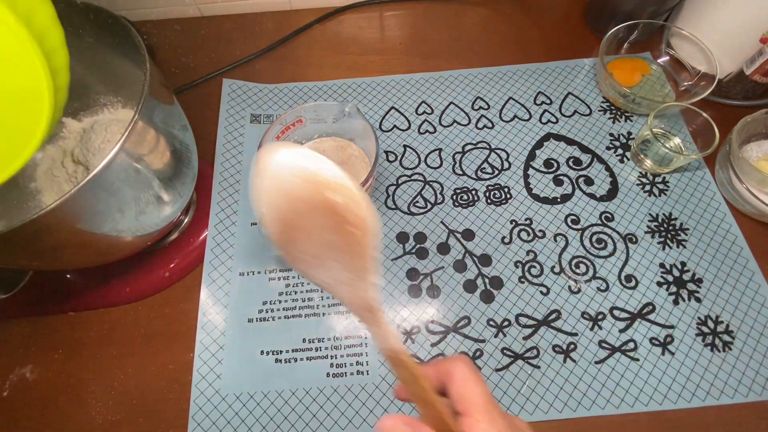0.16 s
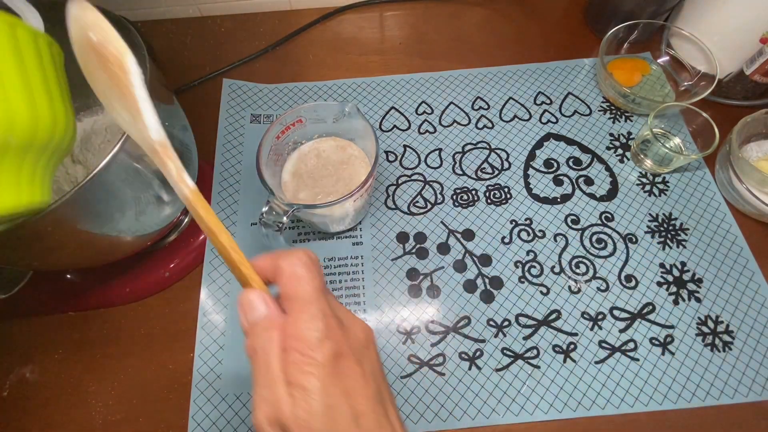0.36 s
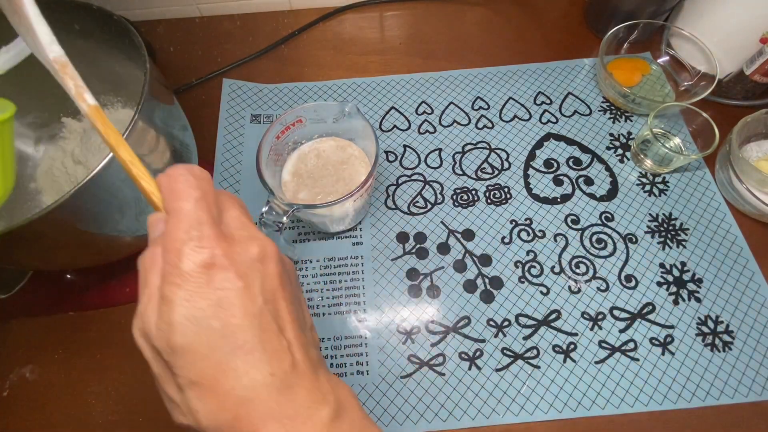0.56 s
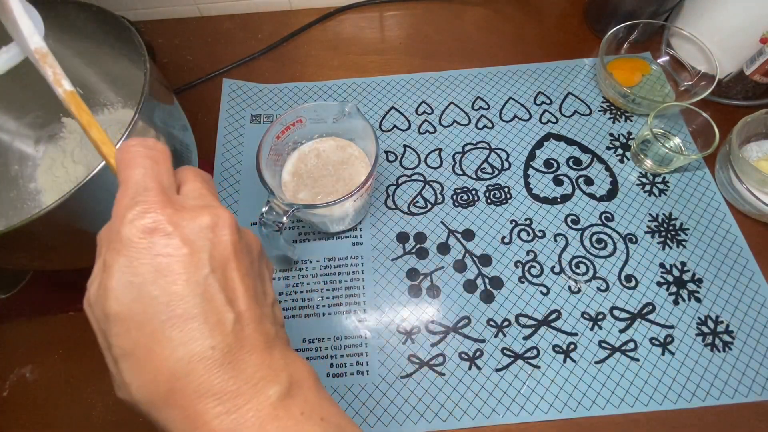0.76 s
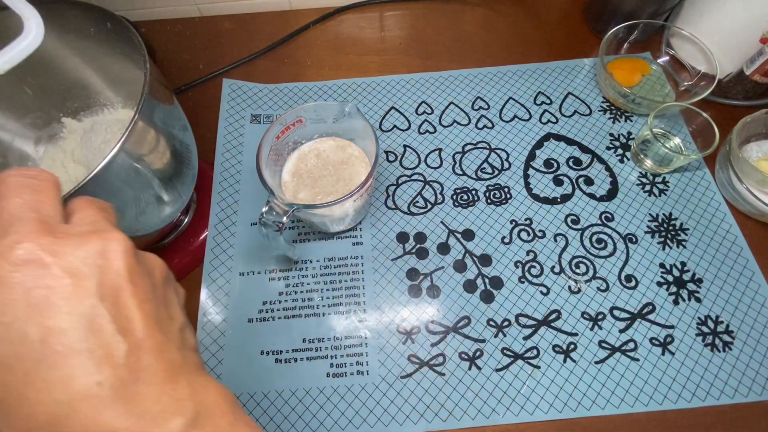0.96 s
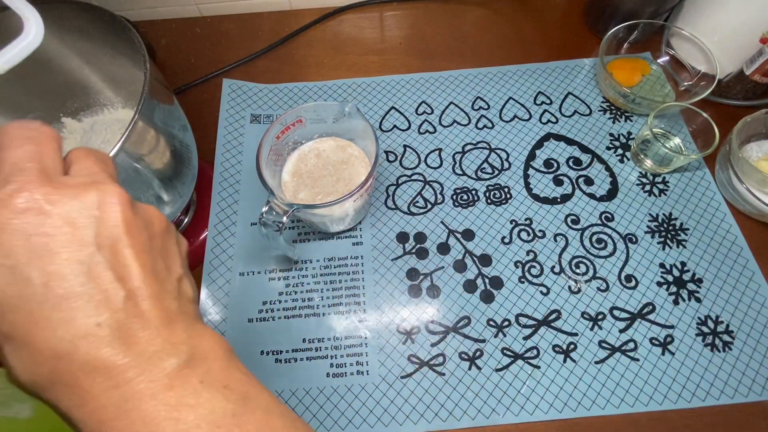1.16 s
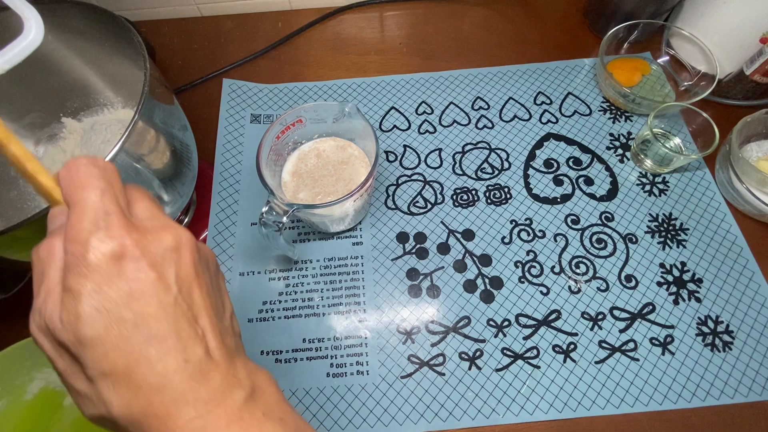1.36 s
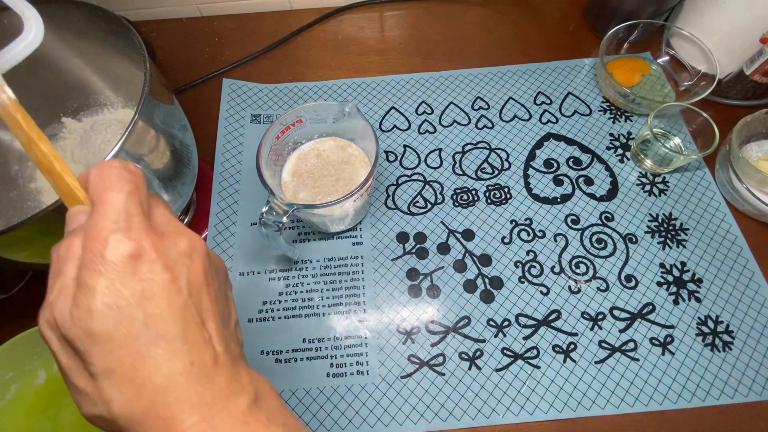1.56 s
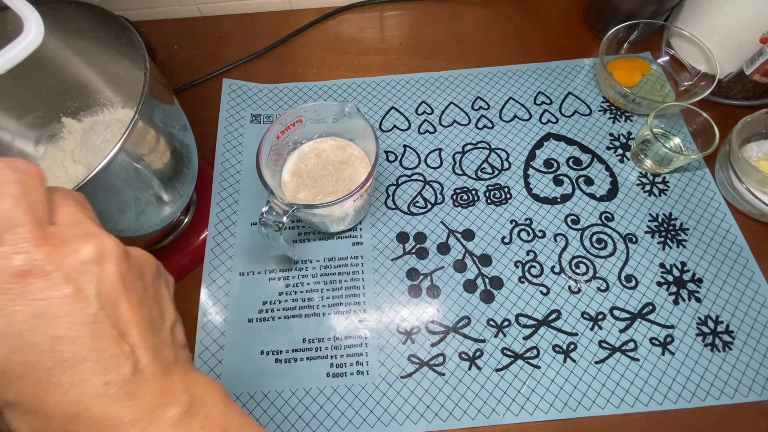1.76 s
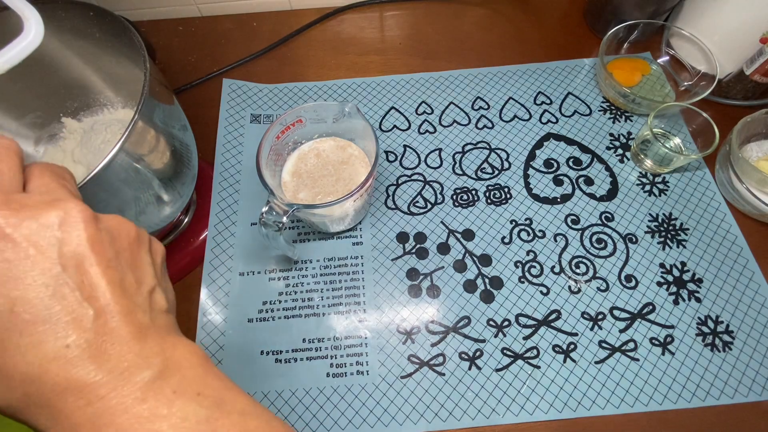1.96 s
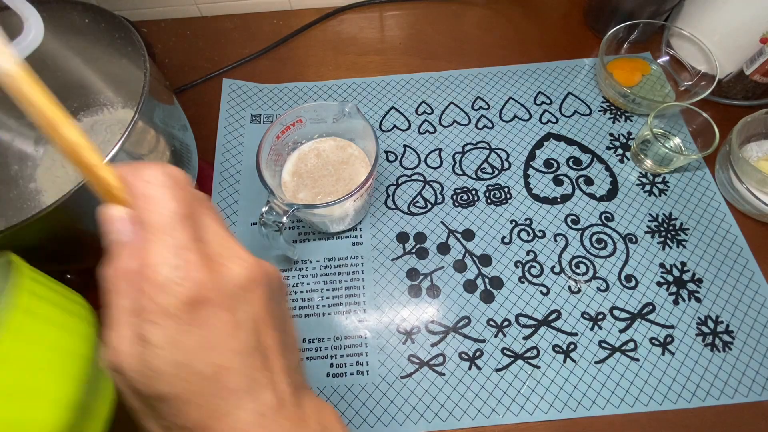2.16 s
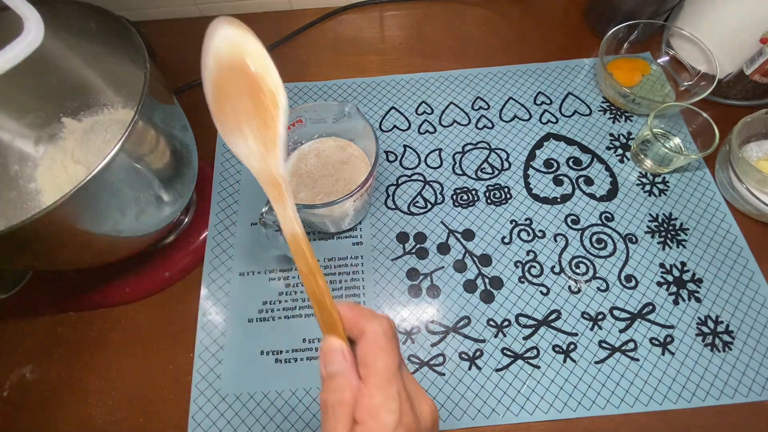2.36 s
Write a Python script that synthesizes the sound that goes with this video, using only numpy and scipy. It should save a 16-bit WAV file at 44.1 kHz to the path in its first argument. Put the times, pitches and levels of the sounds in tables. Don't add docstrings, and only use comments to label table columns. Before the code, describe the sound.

Plastic bowl knocking on a steel mixer bowl, close and slightly left in a small kitchen. A fading metallic ring opens; a hard hollow knock at 0.24 seconds rebounds softly at 0.33. Handling rubs lead to faint flour hiss around 0.75-1.0. Two knocks land at 1.23 and 1.32, light spoon taps at 1.4, a loud dull tap at 1.8, then small nudges and scrapes over quiet low room noise.

```python
import sys
import numpy as np
from scipy import signal
from scipy.fft import rfft, irfft, next_fast_len
from scipy.io import wavfile

SR = 44100
rng = np.random.default_rng(int(sys.argv[2]) if len(sys.argv) > 2 else 0)


def bounce(signal):
    frames = np.transpose(np.atleast_2d(signal))
    limited = np.clip(frames, -1, 1)
    pcm = np.round(limited * 32767).astype(np.int16)
    wavfile.write(sys.argv[1], SR, pcm)


def how_loud(loudness_db):
    steps = np.asarray(loudness_db, float) / 20
    return 10 ** steps


N = 110250
TIME = np.arange(N) / SR


def rms_one(x):
    return x / np.sqrt(np.mean(x ** 2) + 1e-20)


def at_hz(points, hz):
    table = np.array(points)
    return np.interp(np.log(hz), np.log(table[:, 0]), table[:, 1])


def drift(rate_hz):
    r = np.exp(-80 * np.pi * rate_hz / SR)
    slow = signal.lfilter([1], [1, -2 * r, r * r], rng.standard_normal(N // 40 + 2002))[2000:]
    return np.interp(np.arange(N) / 40, np.arange(len(slow)), rms_one(slow))


def ring(clicks, hz, t60_s):
    r = how_loud(-60 / (t60_s * SR))
    w = 2 * np.pi * hz / SR
    return signal.lfilter([0, np.sin(w)], [1, -2 * r * np.cos(w), r * r], clicks + 1e-18)


def train(times_s, gains):
    out = np.zeros(N)
    places = np.clip((np.asarray(times_s) * SR).astype(int), 0, N - 1)
    np.add.at(out, places, gains)
    return out


def grains(per_s, uneven_db):
    sizes = how_loud(uneven_db * np.minimum(rng.exponential(1, N), 4)) * rng.choice([-1, 1], N)
    return sizes * (rng.random(N) < per_s / SR)


# hz, likeness_0_to_1
LIKENESS = [(50, 0.73), (300, 0.7), (1000, 0.16), (4000, 0.16), (12000, 0)]


def banded(spectrum, envelope):
    out, power = 0, 0
    edges = 34 * 2 ** np.arange(0, 9.1, .5)
    white = rng.standard_normal((2, 2, N))
    for k, (low, high) in enumerate(zip(edges, edges[1:])):
        hz = np.sqrt(low * high)
        if spectrum[0][0] / 1.5 < hz:
            band = signal.butter(2, [low, high], "band", fs=SR, output="sos")
            mid, side = signal.sosfilt(band, white[k % 2])
            alike = np.clip(at_hz(LIKENESS, hz), 0, 1)
            gain = how_loud(at_hz(spectrum, hz))
            level = gain * envelope(hz)
            out = out + level * (np.sqrt(1 + alike) * mid + np.sqrt(1 - alike) * side * [[1], [-1]])
            power += 2 * gain ** 2 * np.mean(mid ** 2)
    return out / np.sqrt(power)


def struck(events, modes, contact_s, level_db):
    spread_db = 1.0
    start_s, peak_db = np.transpose(events)[:2]
    luck = rng.standard_normal((len(start_s), 14, 3))
    out = np.zeros((2, N))
    for k, (hz, mode_db, t60_s) in enumerate(modes):
        luck_db = spread_db * (luck[:, k, 0] + luck[:, k, 1:].T)
        gain = how_loud(peak_db + mode_db + level_db + luck_db)
        swell_s = contact_s * 400 / hz + 1 / hz
        clicks = np.array([train(start_s, g) for g in gain])
        force = ring(clicks, hz, swell_s * np.log(1000)) * 2 / (swell_s * SR)
        out += ring(force, hz, t60_s)
    return out


# hz, t60_s
DYING = [(80, 0.69), (300, 0.36), (1000, 0.2), (3000, 0.19), (8000, 0.18), (15000, 0.098)]


def crack(events, spectrum, level_db):
    snap_t60_s, snap_db, snap_rise_s, body_rise_cycles = .014, 6, .0003, 0.45
    start_s, peak_db, bright_db = np.transpose(events)
    lumps = how_loud(1.5 * drift(60))

    def decay(power, t60_s):
        return signal.lfilter([1], [1, -how_loud(-120 / (t60_s * SR))], power)

    def envelope(hz):
        rise = np.exp(-1 / ((snap_rise_s + body_rise_cycles / hz) * SR))
        share = np.clip(np.log2(hz / 1200) / 1.57, 0, 1)
        blow_db = peak_db + level_db + share * (bright_db - bright_db[0])
        power = signal.lfilter([1 - rise], [1, -rise], train(start_s, how_loud(2 * blow_db)) + 1e-18)
        tail = decay(power, at_hz(DYING, hz))
        snap = decay(power, snap_t60_s)
        return np.sqrt(tail + how_loud(2 * snap_db) * np.clip(hz / 1500, 0, 1) * snap) * lumps

    return banded(spectrum, envelope)


# start_s, peak_db, brightness_db
KNOCKS_FULL = [
    (.2375, -6, -27),
    (.3275, -24, -39),
]
KNOCKS_EMPTY = [
    (1.229, -6.5, -33),
    (1.3174, -14.5, -34),
]
# hz, level_db, t60_s
BOWL_FULL = [(103, -19, 0.3), (170, -11.5, 0.13), (280, -17, 0.26), (323.6, 2, 0.16), (387.8, -7.5, .25),
             (479, -1, 0.084), (673, -19, 0.09), (767, -5.5, 0.058), (1128, -14, 0.11), (1334, -8, 0.1),
             (1520, -31, 0.053), (1890, -27, 0.22)]
BOWL_EMPTY = [(107, -14, 0.16), (174.8, -18, 0.43), (219, -27, 0.23), (276.2, -5.5, 0.17),
              (314.2, -4.5, 0.19), (464, -33, 0.061), (463, 2, 0.13), (557.2, -12.5, 0.2),
              (740.3, -11, 0.1), (798.5, -7, 0.094), (970, -18, 0.14), (1245, -18, 0.15),
              (1794, -13, 0.035), (3264, -22.5, 0.066)]
CONTACT_S, KNOCK_DB = .002, -2.5


def knocks():
    full = struck(KNOCKS_FULL, BOWL_FULL, CONTACT_S, KNOCK_DB)
    return full + struck(KNOCKS_EMPTY, BOWL_EMPTY, CONTACT_S, KNOCK_DB)


# start_s, peak_db, brightness_db
NUDGES = [(0.393, -31.5, -34.5), (.632, -39.5, -29), (0.661, -41, -24.5), (1.422, -30.5, -35),
          (1.448, -29, -53), (1.598, -42.5, -37), (1.626, -46, -39), (1.931, -27, -33), (1.964, -30, -29),
          (2.4, -40.5, -50), (2.42, -49.5, -58)]


def nudges():
    hand_damping = 0.57
    modes = [(hz, db / 2, hand_damping * t60_s) for hz, db, t60_s in BOWL_EMPTY[1:10]]
    return struck(NUDGES, modes, CONTACT_S, -2.5)


# start_s, peak_db, brightness_db
EARLIER_KNOCK = [
    (0, -27, -23.5),
]
# hz, density_db_per_hz
CRACK = [(40, -48), (100, -22), (300, -15), (600, -16), (1500, -25.5), (3100, -32.5), (8000, -43.5),
         (16000, -58)]


def knock_cracks():
    return crack(KNOCKS_FULL + KNOCKS_EMPTY + NUDGES + EARLIER_KNOCK, CRACK, -12.5)


# start_s, peak_db
RIM_KNOCKS = [
    (.24, -25),
    (.328, -23),
]
# hz, level_db, t60_s
RIM = [(441, -10, .25), (720, -2, .15), (1281, -14, .15), (598, -5, .6), (926, -12, .45)]
TAP_CONTACT_S = .0003


def rim():
    return struck(RIM_KNOCKS, RIM, TAP_CONTACT_S, 0)


# hz, level_db, t60_s, swell_s
STEEL = [(781, -6, .2, .01), (1502, 0, .22, .005), (2476, -5, .17, .003), (3822, 3, .45, .015),
         (7865, -11, .12, .003), (5529, 1, .32, .026), (4110, -5, .1, .006)]


def steel():
    level_db, beat_hz = -44, 11.0
    out = 0
    for k, (hz, db, t60_s, swell_s) in enumerate(STEEL):
        beat = 1 + 0.3 * np.sin(2 * np.pi * beat_hz * TIME + k)
        swell = 1 - np.exp(-(TIME / swell_s) ** 2)
        out = out + how_loud(level_db + db - 60 * TIME / t60_s) * np.sin(2 * np.pi * hz * TIME) * beat * swell
    return out


# time_s, level_db
FLOUR = [(.7, -84.5), (.75, -57.5), (.86, -55), (.9, -65.5), (.99, -66), (1.05, -88)]
# hz, density_db_per_hz
FLOUR_COLOUR = [(1500, -31), (2500, -26), (4200, -3.5), (6000, -15), (8000, -5.5), (12000, -13),
                (16000, -4.5)]
# hz, width_hz, level_db
FLOUR_RINGS = [(2420, 200, -9.5), (6130, 250, -1.5), (8800, 370, -12), (990, 120, -12)]


def flour():
    hiss = banded(FLOUR_COLOUR, lambda hz: how_loud(2.8 * drift(24)))
    grit = rng.standard_normal((2, N)) * how_loud(2.1 * drift(40))
    for hz, width_hz, db in FLOUR_RINGS:
        hiss = hiss + how_loud(db) * rms_one(ring(grit, hz, 1.6 / width_hz))
    return hiss * how_loud(np.interp(TIME, *np.transpose(FLOUR), left=-120, right=-120))


# start_s, peak_db, brightness_db
TAPS = [
    (0.7073, -52, -22),
    (0.7764, -64, -11),
    (1.395, -36.5, -15),
    (1.4288, -39.5, -11),
    (1.799, -22, -30),
    (1.9748, -47, -14.5),
]
# hz, level_db, t60_s
SPOON = [(500, 0, .04), (1308, -1, .06), (1717, 2, .05), (2050, 1, .03), (2300, 1, .03), (2487, -3, .05),
         (2680, 2, .03), (2900, 2, .03)]
# hz, density_db_per_hz
TAP_CRACK = [(150, -11), (480, -4.5), (800, -20.5), (1300, -4.5), (2600, -8), (4000, -17.5), (11000, -27),
             (16000, -21.5)]


def taps():
    return struck(TAPS, SPOON, TAP_CONTACT_S, -8.5)


def tap_cracks():
    return crack(TAPS, TAP_CRACK, -9.5)


# peak_s, half_length_s, level_db, centre_hz
SCRAPES = [(0.111, 0.013, -59.5, 13500), (0.126, 0.072, -62, 4630), (0.495, 0.2, -59, 2270),
           (0.654, 0.023, -67, 3650), (1.14, 0.029, -58.5, 4060), (0.464, 0.16, -68, 5700),
           (2.428, 0.067, -77.5, 14100), (1.227, 0.008, -44, 1350), (0.232, 0.0025, -52, 1300),
           (1.378, 0.1, -60, 5000), (1.866, 0.049, -60, 8000), (1.948, 0.032, -56.5, 4100),
           (2.142, 0.031, -57.5, 3900), (2.272, 0.1, -64, 2920), (2.36, 0.024, -68.5, 12600),
           (2.46, 0.068, -80, 14000)]


def scrapes():
    grits_per_s, uneven_db = 11000, 4.3
    grit = np.array([grains(grits_per_s, uneven_db) for side in range(2)])
    out = 0
    for peak_s, half_s, db, hz in SCRAPES:
        band = signal.butter(1, [hz / 2.32, min(hz * 1.46, 20000)], "band", fs=SR, output="sos")
        rasp = rms_one(signal.sosfilt(np.r_[band, band], grit))
        out = out + rasp * how_loud(db) * np.exp(-((TIME - peak_s) / half_s) ** 2)
    return out


# start_s, peak_db, centre_hz
TICKS = [(.2372, -31, 3500), (.241, -21, 1000), (.3288, -20, 750), (.5177, -57, 4000), (.6624, -56, 4000),
         (.7072, -44, 1100), (.7342, -55, 6000), (.7527, -52, 6000), (1.1288, -52, 4200),
         (1.2292, -36, 7000), (1.2335, -35, 11000), (1.3176, -38, 8000), (1.3322, -43, 10000),
         (1.3952, -39, 5000), (1.3965, -46, 14000), (1.4292, -31, 11000), (1.7993, -20, 2400),
         (1.9155, -54, 4500), (1.9425, -51, 5000), (1.9714, -46, 4500), (2.1316, -49, 4200),
         (2.3555, -58, 11000), (2.3979, -59, 13000), (2.4374, -62, 13000)]


def ticks():
    span, level_db = 1.8, 4.5
    out = 0
    for start_s, db, hz in TICKS:
        band = signal.butter(2, [hz / span, min(hz * span, 19000)], "band", fs=SR, output="sos")
        pulse = signal.sosfilt(band, np.eye(1, 600)[0])
        out = out + np.convolve(train([start_s], how_loud(db + level_db)), pulse / np.abs(pulse).max())[:N]
    return out


# start_s, level_db, pitch_hz, t60_s
PINGS = [(.706, -50, 2480, .07), (.771, -51, 2480, .09), (.875, -48, 1000, .05), (.91, -49, 1000, .07),
         (.713, -43, 330, .08), (.633, -35, 335, .17), (.817, -50, 480, .08), (1.13, -49, 430, .1),
         (1.396, -37, 1800, .07), (1.518, -40, 275, .1), (1.6, -42, 474, .2), (1.932, -29, 380, .09),
         (1.943, -46, 1800, .06), (1.961, -32, 300, .09), (1.978, -35, 250, .09), (2.213, -50, 480, .1),
         (.327, -28, 700, .25), (.255, -25, 610, .2), (.239, -23, 1085, .1), (.24, -34, 2450, .1),
         (.24, -38, 4600, .1), (.274, -36, 1900, .08), (.385, -33, 640, .2), (.48, -40, 322, .3),
         (.935, -57, 2480, .12), (1.995, -39, 190, .15)]


def pings():
    swell_cycles = 2.5
    out = 0
    for start_s, db, hz, t60_s in PINGS:
        t = np.clip(TIME - start_s, 0, None)
        swell = 1 - np.exp(-t * hz / swell_cycles)
        out = out + how_loud(db - 60 * t / t60_s) * swell * np.sin(2 * np.pi * hz * t)
    return out


# time_s, level_db
HANDLING = [(0, -50), (.2, -66), (.45, -43.5), (.66, -40.5), (.85, -52), (1.1, -58), (1.2, -43),
            (1.45, -32), (1.58, -51.5), (1.66, -49), (1.9, -55), (2.02, -47), (2.08, -55), (2.2, -45.5),
            (2.32, -66), (2.43, -47), (2.5, -68)]


def handling():
    rubs_per_s, level_db = 190, -5.5
    rubs = np.array([signal.lfilter([1], [1, -.9], grains(rubs_per_s * how_loud(6.9 * drift(17)), 2.7))
                     for part in range(3)])
    body = 0
    for hz, db, t60_s in BOWL_EMPTY[:11] + BOWL_FULL[4:7]:
        body = body + ring(rubs, hz, .5 * t60_s) * how_loud(0.51 * db)
    rumble = rms_one(body[0] + 0.22 * body[1:])
    return rumble * how_loud(level_db + np.interp(TIME, *np.transpose(HANDLING)))


# start_s, level_db, pitch_hz
BUMPS = [
    (.0, -32.5, 94),
    (0.251, -23.5, 76),
    (.54, -33, 172),
    (2.001, -36, 182),
    (2.183, -36, 71),
    (.74, -40, 60.5),
]


def bumps():
    t60_s = 0.11
    soft = signal.windows.hann(200) / 100
    return sum(ring(np.convolve(train([start_s], how_loud(db)), soft)[:N], hz, t60_s) for start_s, db, hz in BUMPS)


def kitchen(x):
    t60_s, wall_cut_hz = 0.31, 8700
    size = next_fast_len(N + SR)
    w = 2 * np.pi * np.arange(size // 2 + 1) / size
    dull = 1 / (1 + 1j * w * SR / (2 * np.pi * wall_cut_hz))
    lags_s = rng.uniform(.009, .035, 16)
    loops = [how_loud(-60 * lag / t60_s) * dull * np.exp(-1j * w * lag * SR) for lag in lags_s]
    sides = [sum((-1) ** k * g / (1 - g) for k, g in enumerate(loops[side::2])) for side in range(2)]
    return irfft(rfft(x, size) * np.array(sides), size)[:, :N]


# hz, density_db_per_hz
FLOOR = [(25, -22), (76, 2.5), (230, -14.5), (500, -14), (1000, -18.5), (4000, -39.5), (9000, -53),
         (16000, -36.5)]


def floor():
    return how_loud(-56) * banded(FLOOR, lambda hz: how_loud(0.5 * drift(14)))


def place_left(near):
    pan_db, lag_s, shade_hz, shade = 4, .00045, 5000, .24
    left, right = near * how_loud([[pan_db / 2], [-pan_db / 2]])
    high = signal.butter(1, shade_hz, "high", fs=SR, output="sos")
    treble = shade * signal.sosfilt(high, [left, right])
    left, right = left - treble[0], right + treble[1]
    return np.array([left, np.pad(right, (int(lag_s * SR), 0))[:N]])


def scene():
    blows = knocks() + taps() + rim() + steel() + nudges()
    near = blows + knock_cracks() + tap_cracks() + handling() + flour() + scrapes() + ticks() + pings()
    return place_left(near) + floor() + how_loud(-18) * kitchen(near.mean(axis=0)) + bumps()


def roll_off(x):
    return signal.sosfilt(signal.butter(12, 16870, fs=SR, output="sos"), x)


def record(dry):
    top, low_hz, notch_hz, notch_width_hz, cutoff_hz = 0.71, 47.3, 13050, 1500, 16250
    edges_hz = [notch_hz - notch_width_hz / 2, notch_hz + notch_width_hz / 2]
    chain = np.r_[signal.butter(3, low_hz, "high", fs=SR, output="sos"),
                  signal.butter(2, edges_hz, "stop", fs=SR, output="sos"),
                  signal.cheby2(12, 60, cutoff_hz * 1.03, fs=SR, output="sos")]
    mix = signal.sosfilt(chain, top * np.tanh(dry / top))
    return roll_off(mix)


dry = scene()
out = record(dry)
bounce(out)
```